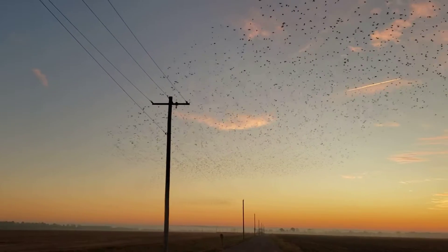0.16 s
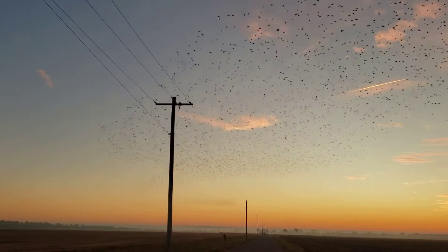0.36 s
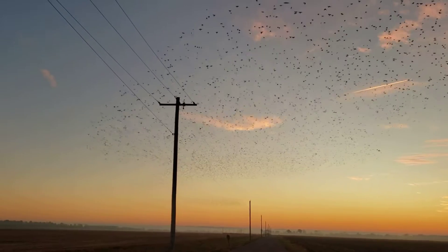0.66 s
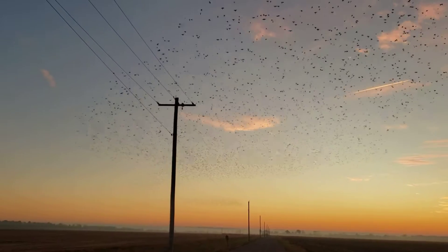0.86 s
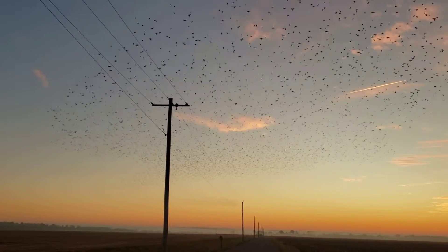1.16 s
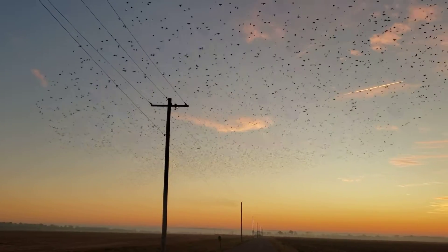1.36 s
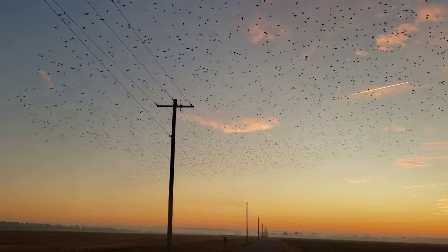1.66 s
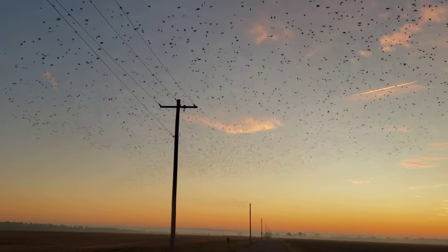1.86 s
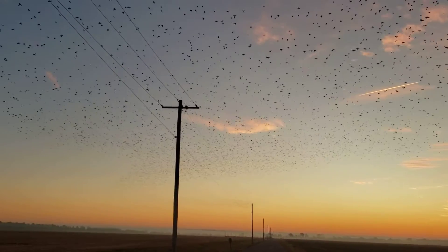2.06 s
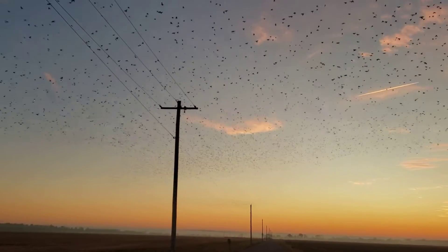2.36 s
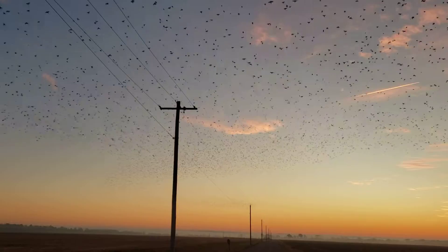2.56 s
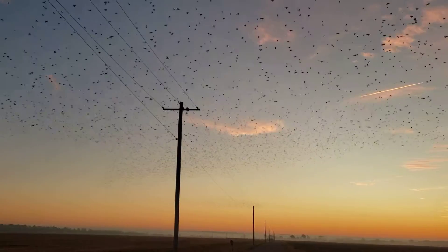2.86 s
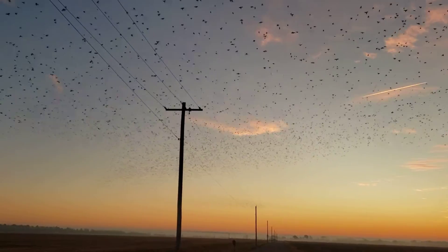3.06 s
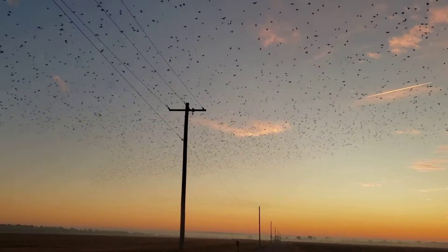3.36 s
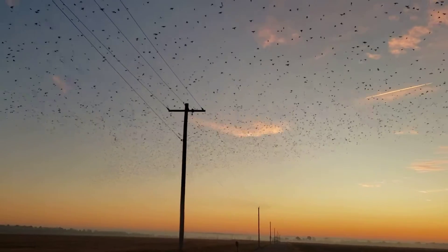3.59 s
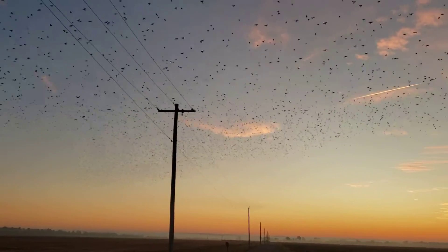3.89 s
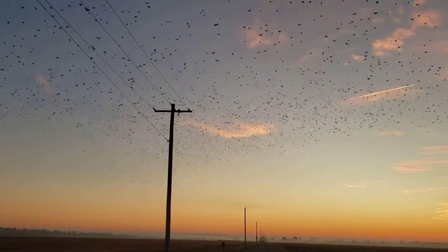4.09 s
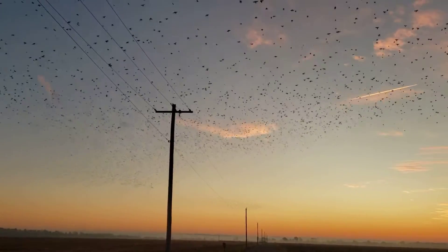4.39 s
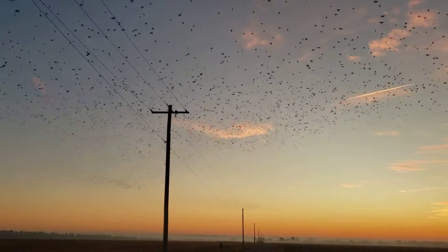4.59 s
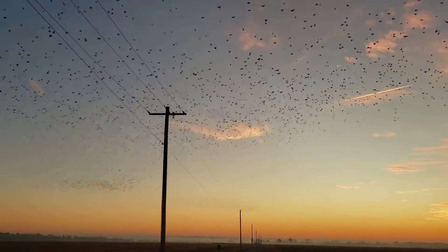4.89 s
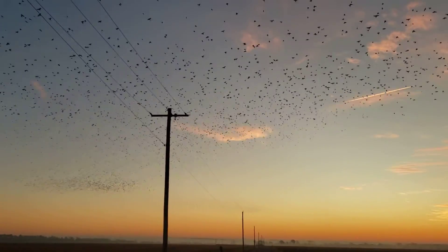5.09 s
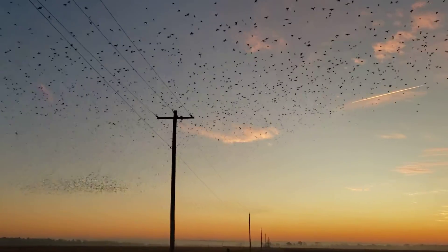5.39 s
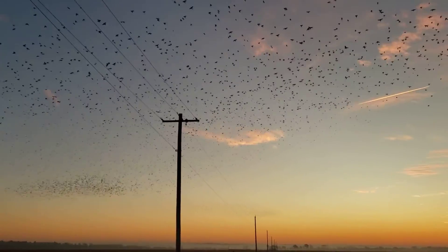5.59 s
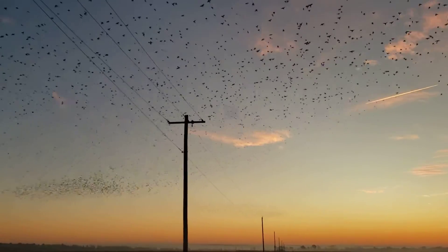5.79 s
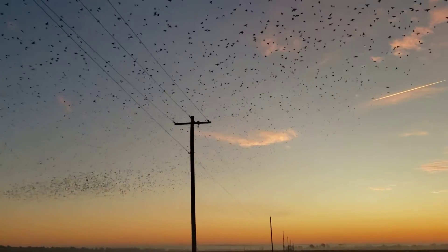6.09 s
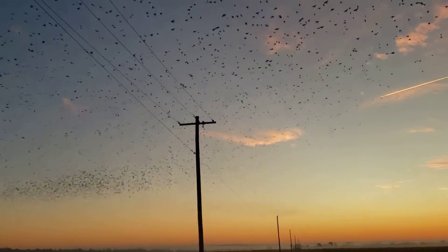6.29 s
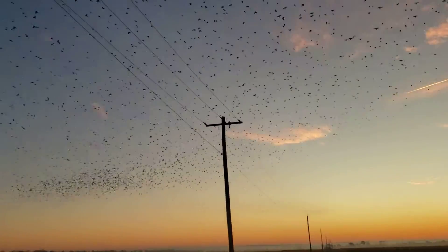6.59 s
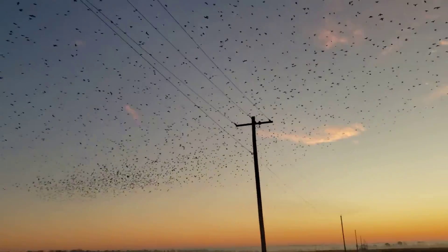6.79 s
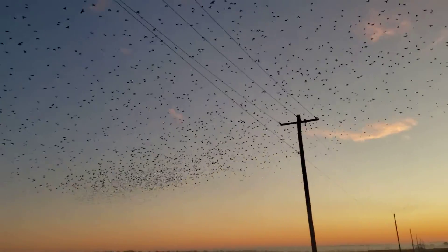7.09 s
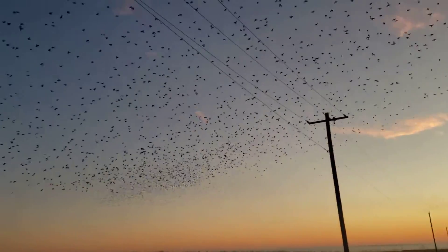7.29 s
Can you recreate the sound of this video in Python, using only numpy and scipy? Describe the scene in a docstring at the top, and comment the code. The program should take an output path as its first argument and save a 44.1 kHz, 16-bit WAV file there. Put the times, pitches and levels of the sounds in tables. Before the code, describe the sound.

Dense bird chatter begins at full flow, a sizzling mid-high wash over airy wing rush. Rough short chucks come frequently in the first three seconds; clear gliding chips gather later. The chatter swells mildly around the middle, then drops near the end. Low steady idling, brief soft wind and muffled handling-like rustles lie beneath, plus faint distant boom-and-slap thuds. Open air, no echoing space; left side bright, right side muffled.

```python
"""Blackbird flock over a field at dawn

A huge flock streams over the microphones: beating wings are shaped noise, merged into a rush, and gliding
whistles and raspy chucks make the chatter; a few near calls stand out. An engine idles close by as a low
tone over a rumble, a breeze touches the microphone as lumps of low noise, soft rustles puff beside it,
and far thuds, perhaps shots, arrive as a boom and a slap. The right channel is weak and dull."""
import sys
import numpy as np
from scipy.fft import rfft, irfft, next_fast_len
from scipy.io import wavfile
from scipy.ndimage import uniform_filter1d, map_coordinates

SR = 44100
rng = np.random.default_rng(int(sys.argv[2]) if len(sys.argv) > 2 else 0)


def dump(signal):
    """Clip the signal to [-1, 1] and save it as 16-bit WAV at the path in sys.argv[1]."""
    limited = np.clip(np.atleast_2d(signal).T, -1, 1)
    pcm = np.round(limited * 32767).astype(np.int16)
    wavfile.write(sys.argv[1], SR, pcm)


N = 328545  # samples

# Colour of the calling. Each row: frequency in Hz, gain in dB.
CALL_COLOUR = [(1200, -26), (2200, -5.5), (3150, 0), (3800, -1.5), (4600, -6), (5400, -8), (6500, -4),
               (7100, -9), (7800, -22), (8600, -31), (11500, -34.5), (16000, -46)]
# Colour of the calls' bright edge. Each row: frequency in Hz, gain in dB.
EDGE_COLOUR = [(5000, -40), (7500, -23), (8700, -7.5), (10000, 2), (11700, 5), (13500, 1.5), (16000, -6)]
# How alike the two microphones hear a wide field. Each row: frequency in Hz, left-right likeness (1 = same).
LIKENESS = [(60, 0.95), (200, 0.87), (380, 0.83), (700, 0.64), (1300, 0.045), (4000, 0.052)]


def amp(db):
    """Decibels to gain."""
    return 10 ** (np.asarray(db) / 20)


def unit(x):
    """Scale to rms 1."""
    return x / np.sqrt(np.mean(x ** 2) + 1e-20)


def along(points, hz):
    """Read (Hz, value) points on a log frequency axis."""
    f, v = np.transpose(points)
    return np.interp(np.log(hz + 1), np.log(f + 1), v)


def curve(rows):
    """Join (seconds, value) points by straight lines, one value per sample."""
    s, v = np.transpose(rows)
    return np.interp(np.arange(N) / SR, s, v)


def wobble(rate):
    """A smooth random curve with rate knots a second."""
    knots = rng.standard_normal(int(N * rate / SR) + 4)
    return map_coordinates(knots, [np.arange(N) * rate / SR])


def filtered(x, response):
    """Multiply the spectrum of x by a response of frequency."""
    m = next_fast_len(N + SR // 2)
    return irfft(rfft(x, m) * response(np.fft.rfftfreq(m, 1 / SR)), m)[..., :N]


def diffuse(pair, spectrum):
    """Colour two unrelated signals into a wide stereo field whose middle has rms 1."""
    def middle_and_side(hz):
        # the angle shares power between middle and side to give the wanted likeness
        angle = np.arccos(np.clip(along(LIKENESS, hz), -1, 1)) / 2
        return amp(along(spectrum, hz)) * [np.cos(angle), np.sin(angle)]
    mid, side = filtered(pair, middle_and_side)
    return np.array([mid + side, mid - side]) / np.std(mid)


def noise():
    """Two unrelated white noises."""
    return rng.standard_normal((2, N))


def scatter(starts, rows):
    """Sum short sounds, one a row, at their start times in seconds."""
    at = np.round(starts * SR).astype(int)[:, None] + np.arange(rows.shape[1])
    inside = (at >= 0) & (at < N)
    return np.bincount(at[inside], rows[inside], N)


def breeze():
    """Air on the microphone: soft lumps of low noise, different on each port."""
    # Colour of the air. Each row: frequency in Hz, gain in dB.
    air_colour = [(15, -17), (35, -6), (50, 4), (70, -2), (120, -12), (400, -44)]
    # Gusts. Each row: time in seconds, level in dB before the trim and chance swelling below.
    gusts = [(0, -74), (1.3, -63), (1.9, -52), (2.25, -60), (2.5, -51), (2.75, -67), (6.2, -83), (6.8, -58),
             (7.45, -75)]
    lumps = unit(filtered(noise(), lambda hz: amp(along(air_colour, hz))))
    trim_db = 1.5
    return amp(curve(gusts) + 1.4 * wobble(12) + trim_db) * lumps


def engine(hum_hz=80, hum_db=-51.0, rumble_db=-58.0):
    """A slightly unsteady low hum with faint added partials, over a low rumble."""
    # Colour of the rumble. Each row: frequency in Hz, gain in dB.
    rumble_colour = [(20, -24), (35, -23), (55, 3.5), (80, -0.5), (110, -2.5), (160, -6), (220, -13),
                     (260, -10.5), (330, -15.5), (600, -20), (2000, -39)]
    # The hum and the faint partials added over it. Each row: multiple of the hum's pitch, relative level in dB.
    partials = [(1, -0.5), (2, -28), (3.25, -28.5)]
    phase = 2 * np.pi * np.cumsum(hum_hz + 0.375 * wobble(5)) / SR
    hum = np.sqrt(2) * sum(amp(db) * np.sin(k * phase) for k, db in partials)
    rumble = diffuse(noise(), rumble_colour)
    return amp(hum_db + .3 * wobble(3.7)) * hum + amp(rumble_db) * rumble


def thuds(boom_hz=160, boom_s=0.014, slap_hz=430, slap_s=0.0017, delay_s=.031, repeat_s=0.0066):
    """A low boom of about two cycles, then a thin, sharp double slap off the surroundings."""
    # Far thuds. Each row: start in seconds, nominal peak in dB.
    far_thuds = [(4.186, -38), (5.1357, -35), (6.549, -34)]
    s, db = np.transpose(far_thuds)
    size = amp(db)[:, None]
    t = np.arange(SR // 20) / SR
    boom_swell = np.sin(np.pi * np.clip(t / boom_s, 0, 1) ** .5)
    boom = size * np.sin(2 * np.pi * boom_hz * t) * boom_swell
    slap = -size * np.sin(2 * np.pi * slap_hz * t) * np.exp(-t / slap_s)
    slaps = scatter(s + delay_s, slap) + .5 * scatter(s + delay_s + repeat_s, slap)
    return scatter(s, boom) + slaps


def rustles():
    """Brief, dull puffs of noise near the microphone, each with a bell-shaped swell."""
    # Rustles. Each row: middle in seconds, time from the peak to 1/e of it in seconds, level in dB.
    puffs = [(4.025, 0.025, -53.5), (4.11, .02, -55), (4.212, 0.027, -53), (5.174, 0.021, -58),
             (6.465, 0.022, -58), (6.6, 0.078, -59)]
    t = np.arange(N) / SR
    swell = sum(amp(db) * np.exp(-((t - s) / width) ** 2) for s, width, db in puffs)
    dull = [(100, -18), (250, -4.5), (400, -2), (700, -12), (1500, -35), (4000, -70)]  # Hz, dB
    return swell * diffuse(noise(), dull)


def chips(length, hz, glide, rasp, overtone_db, count=4400):
    """One call a row, count samples long: a gliding whistle with two overtones, frayed by fast pitch jitter."""
    u = np.clip(np.arange(count) / SR / length[:, None], 0, 1)  # progress through the call
    jitter = unit(uniform_filter1d(rng.standard_normal(u.shape), size=24, axis=1))
    octaves = glide[:, None] * (u - .5) + 0.197 * rasp[:, None] * jitter
    pitch = hz[:, None] * 2 ** octaves
    phase = (2 * np.pi * np.cumsum(pitch, axis=1) / SR).astype(np.float32)
    overtones = np.sin(2 * phase) + .5 * np.sin(3 * phase)
    voice = np.sin(phase) + amp(overtone_db) * overtones
    return np.sqrt(2) * np.sin(np.pi * u) * voice


def middle_birds(pitch_hz=3700, spread_octaves=.25, length_s=0.0456, level_spread_db=2, count=190):
    """Some two dozen clean chips a second from the middle distance, in the centre of the stereo field."""
    when, span = rng.uniform(size=(count, 2)).T
    tune, slide, size = np.clip(rng.standard_normal((count, 3)), -2, 2).T
    hz = pitch_hz * 2 ** (spread_octaves * tune)
    rasp = np.full(count, .06)
    calls = chips(length_s * (.5 + span), hz, 0.079 * slide, rasp, overtone_db=-4)
    calls = calls * amp(level_spread_db * size)[:, None]
    starts = (np.arange(count) + when) / count * N / SR
    line = scatter(starts, calls)
    # Hz, dB
    colour = [(2500, -6), (3500, 0), (5000, -4), (6600, -6), (8500, -18), (11500, -13), (15000, -24)]
    return unit(filtered(line, lambda hz: amp(along(colour, hz))))


def chucks(pitch_hz=1283, grain_db=1.5, grain_per_s=300):
    """Harsh chucks of nearer birds: short rasps, part noise and part rough harmonics, with a bright edge."""
    # Chucks. Each row: middle in seconds, length in seconds, level in dB before the trim below,
    # bright edge against that in dB before its own trim, voiced share from 0 to 1.
    harsh_calls = [(0.14, .06, -41, -27, 0.15), (0.29, .07, -40, -22, 0.06),
                   (0.60, 0.162, -41.5, -23, 0.15), (0.83, .11, -41.5, -22, 0.2),
                   (1.25, .05, -41.5, -30, .1), (1.48, .13, -43, -21, .1), (1.70, .06, -44, -17, .1),
                   (1.84, .07, -45.5, -17, 0.2), (1.99, .05, -45, -14, .1), (2.14, .09, -39, -22, .1),
                   (2.41, .05, -41, -21, .1), (2.57, .15, -40, -19, 0.3), (2.84, .09, -41.5, -18, .2),
                   (2.99, .09, -41.5, -12, .5), (3.07, .09, -42, -16, .7), (3.87, .07, -46.5, -13, .1),
                   (3.93, .07, -38, -28, .1), (4.332, .07, -42, -21, .1), (4.52, .07, -44, -17, .1),
                   (5.16, .09, -42, -18, 0), (5.90, .09, -47, -14, 0.2), (6.30, .12, -43, -25, 0.2),
                   (6.386, .06, -48, -27, .1), (6.79, .10, -41, -23, .1), (6.96, 0.114, -45, -19, .2),
                   (7.30, .07, -45, -24, .1)]
    body_trim_db, edge_trim_db = -1.5, -1.5
    rise_octaves, drift_octaves, jitter_octaves = 0.069, .015, 0.00808  # within a chuck, slow, fast
    t = np.arange(N) / SR
    body, edge, rise, share = np.zeros((4, N))
    for s, length, db, bright_db, voiced in harsh_calls:
        u = (t - s) / length
        sounding = abs(u) < .5
        swell = amp(db) * np.cos(np.pi * u[sounding])
        body[sounding] += swell
        edge[sounding] += amp(bright_db) * swell
        rise[sounding] = u[sounding]
        share[sounding] = voiced
    octaves = rise_octaves * rise + drift_octaves * wobble(5) + jitter_octaves * wobble(grain_per_s)
    phase = 2 * np.pi * np.cumsum(pitch_hz * 2 ** octaves) / SR
    # harmonics 3 to 10, with unrelated starting phases on the two sides
    voice = unit(sum(np.sin(k * phase + rng.uniform(0, 2 * np.pi, (2, 1))) for k in range(3, 11)))
    throat = np.sqrt(share) * voice + np.sqrt(1 - share) * noise()
    throat = throat * amp(grain_db * wobble(grain_per_s))
    dark = amp(body_trim_db) * body * diffuse(throat, CALL_COLOUR)
    bright = amp(edge_trim_db) * edge * diffuse(throat, EDGE_COLOUR)
    return dark + bright


def near_calls():
    """Clear chips of near birds and a few strong third harmonics of the harsh chucks, as gliding whistles."""
    # Whistles. Each row: middle in seconds, length in seconds, pitch in Hz, glide in octaves,
    # level in dB before the trim below, rasp from 0 to 1.
    # The rows at 2.56, 2.985 and 3.07 s are third harmonics of chucks, the others clear chips.
    whistles = [(0.492, 0.06, 3620, 0, -43, 0.16), (1.30, .05, 4900, -.05, -43, 0.1),
                (1.515, .044, 4700, 0.046, -43, .05), (2.56, 0.099, 3810, 0.0096, -42, .15),
                (2.705, 0.026, 4880, .04, -34.5, 0.08), (2.735, .03, 5040, .06, -36, .02),
                (2.845, .04, 3360, -0.062, -36, .1), (2.985, .06, 3480, 0.14, -48, 0.35),
                (3.07, 0.11, 3840, 0.062, -40, 0.04), (4.32, .08, 4260, 0, -41, .2),
                (4.655, .05, 6800, -.05, -40, .25), (5.28, .06, 4520, -.03, -40, .1),
                (5.684, 0.042, 3800, -0.0056, -42, .2), (5.868, .06, 4300, .08, -44, .15),
                (5.90, 0.077, 6100, -.127, -40, .06), (5.982, .083, 6430, 0, -38.5, .3),
                (6.125, 0.058, 4530, -0.024, -39, .15), (6.305, .03, 5650, .06, -45, .08),
                (6.405, 0.068, 4020, .007, -35, 0.2), (6.602, .07, 2620, -0.031, -48, 0),
                (6.788, 0.044, 4260, -.04, -37.5, 0.13), (7.02, .11, 6370, -0.031, -44, .12),
                (7.142, 0.079, 3240, 0.079, -41, .3), (7.42, 0.047, 3900, .11, -47, .2)]
    trim_db = -7.0
    s, length, hz, glide, db, rasp = np.transpose(whistles)
    calls = chips(length, hz, glide, rasp, overtone_db=-11.5) * amp(db + trim_db)[:, None]
    # Hz, dB: the overtones are unevenly coloured, weak near 9.8 kHz and lifted near 10.5 kHz
    treble = [(7000, 4), (8200, -12.0), (9800, -24.0), (10500, 7), (12500, -10), (14500, -20)]
    return filtered(scatter(s - length / 2, calls), lambda f: amp(along(treble, f)))


def wings(beat_hz=13, swish_s=0.0078, near_share=0.15, count=120):
    """Far wings blur into a rush of noise; each nearer bird adds a train of swishes as it passes."""
    # Colour of the wings. Each row: frequency in Hz, gain in dB.
    wing_colour = [(200, -25), (340, -24.5), (480, -16), (700, -12.5), (1000, -8.5), (1350, -3), (1850, 0),
                   (2500, -1.5), (3500, -1), (6000, -20), (8500, -56), (16000, -50)]
    t = np.arange(SR) / SR  # each pass lasts a second
    when, pace, start, size = rng.uniform(size=(count, 4)).T
    rate = beat_hz * (1 + .5 * (pace[:, None] - .5))
    from_stroke = ((t * rate + start[:, None]) % 1 - .5) / rate  # seconds from the nearest stroke
    passing = np.sin(np.pi * t) ** 2
    power = amp(10 * size[:, None]) * passing * np.exp(-(from_stroke / swish_s) ** 2)
    beats = scatter(when * (N / SR + 1) - 1, power)
    total_power = 1 - near_share + near_share * beats / beats.mean()
    return diffuse(noise() * np.sqrt(total_power), wing_colour)


def chatter(spread_db=1.8, distinct=.36, count=2600):
    """Hundreds of chips and raspy chucks a second, over the noise blur of the farthest birds."""
    when, span, kind, rough = rng.uniform(size=(count, 4)).T
    tune, slide, size = np.clip(rng.standard_normal((count, 3)), -2, 2).T
    hz = np.where(kind < .7, 3400, 5900) * 2 ** (.27 * tune)
    length = 0.01165 + 0.0344 * span
    rasp = .08 + .5 * rough
    calls = chips(length, hz, 0.1035 * slide, rasp, overtone_db=-6.5, count=2400)
    calls = calls * amp(spread_db * size)[:, None]
    # the calls fill the time evenly, and each has its own delay between the paired signals
    starts = (np.arange(count) + when) / count * N / SR - .02
    lag = rng.uniform(-1, 1, count) * .0004
    pair = np.array([scatter(starts + side * lag, calls) for side in (0, 1)])
    single_calls = diffuse(pair, CALL_COLOUR)
    blur = diffuse(noise(), CALL_COLOUR)
    return np.sqrt(distinct) * single_calls + np.sqrt(1 - distinct) * blur


def flock(edge_db=-22.5, middle_db=-12.5):
    """Wings, chips and chatter swell as the birds stream over; the bright edge follows the chatter."""
    # Wing rush, thinning near the end. Each row: time in seconds, level in dB before trim and swelling.
    rush_level = [(0, -39.5), (1.2, -39.5), (2.6, -39.5), (4.0, -40), (5.1, -39.5), (5.5, -40.5),
                  (6.3, -41), (6.5, -43.5), (7.45, -43.5)]
    # Calling of the crowd. Each row: time in seconds, level in dB before trim and swelling.
    crowd_level = [(0, -40.5), (1.2, -40), (2.35, -39), (2.85, -38), (3.25, -38.5), (3.9, -37), (5.1, -38),
                   (5.9, -38.5), (6.35, -39.5), (6.52, -42.8), (7.45, -43)]
    wing_trim_db, chatter_trim_db = 1.0, -0.24
    wing_db = curve(rush_level) + .55 * wobble(16) + wing_trim_db
    chatter_db = curve(crowd_level) + 0.71 * wobble(14) + chatter_trim_db
    # middle birds and bright edge are set against the chatter
    middle = amp(middle_db) * middle_birds()
    edge = amp(edge_db + 0.8 * wobble(30)) * diffuse(noise(), EDGE_COLOUR)
    calling = chatter() + middle + edge
    return amp(wing_db) * wings() + amp(chatter_db) * calling


def scene():
    """Open air: all sources add up, with no reverberation."""
    return flock() + chucks() + near_calls() + engine() + breeze() + rustles() + thuds()


def record(dry, top_hz=15850):
    """The right port is muffled against the left; nothing passes above the band limit."""
    # Imbalance of the microphone pair. Each row: frequency in Hz, left minus right in dB.
    imbalance = [(60, 5), (300, 7), (770, 6.5), (1200, 9.1), (1800, 13), (2700, 15.4), (4000, 16.5),
                 (5200, 19.3), (6700, 27.5), (7600, 17), (8700, 7.7), (11300, 6.5), (13000, 15),
                 (15000, 28)]

    def ports(hz):
        right = amp(-along(imbalance, hz))
        # level of the middle of the pair, divided out: the middle stays unchanged where the ports are alike,
        # and rises by up to 3 dB where they are unrelated
        likeness = np.clip(along(LIKENESS, hz), 0, 1)
        middle = np.sqrt(1 + right ** 2 + 2 * right * likeness) / 2
        return np.array([np.ones_like(hz), right]) / middle * (hz < top_hz)
    return filtered(dry, ports)


dry = scene()
out = record(dry)
dump(out)
```